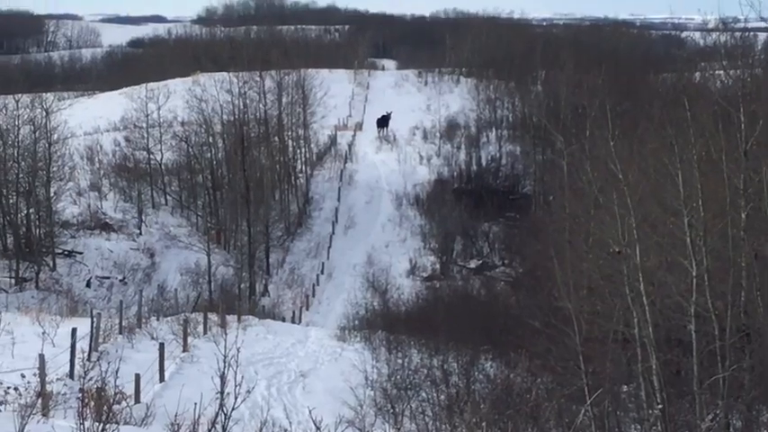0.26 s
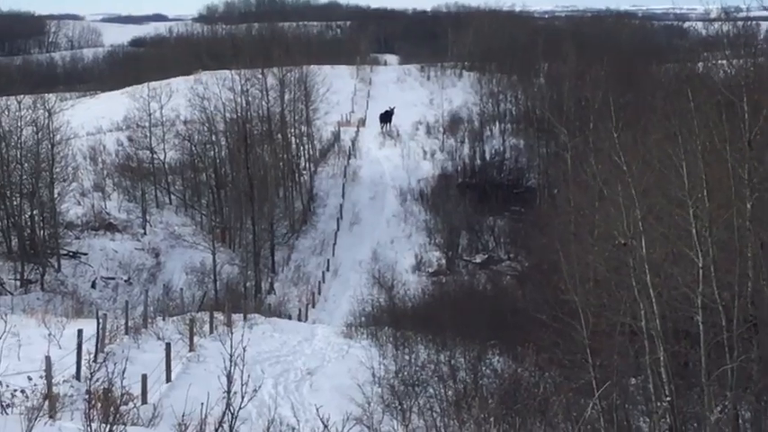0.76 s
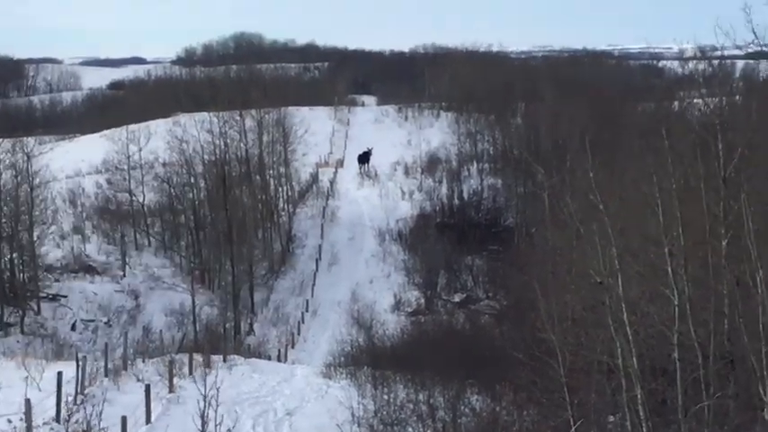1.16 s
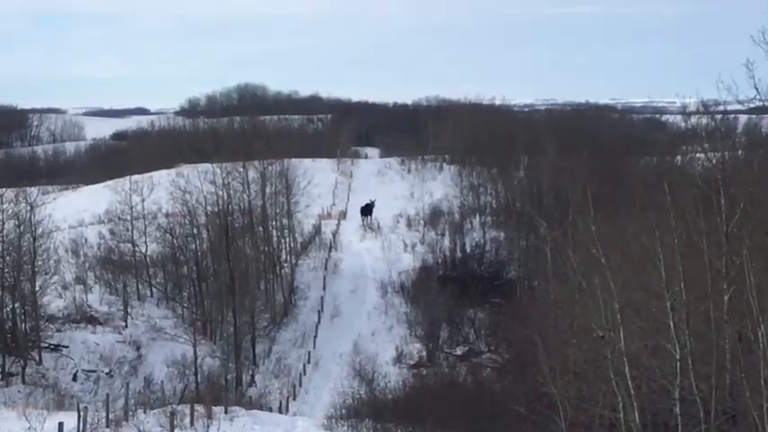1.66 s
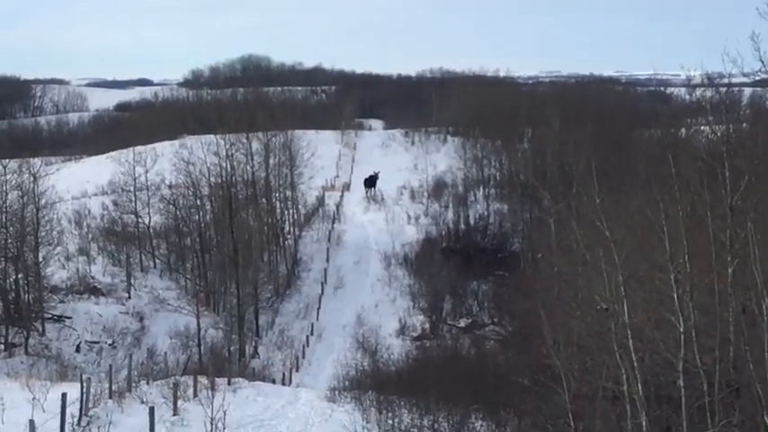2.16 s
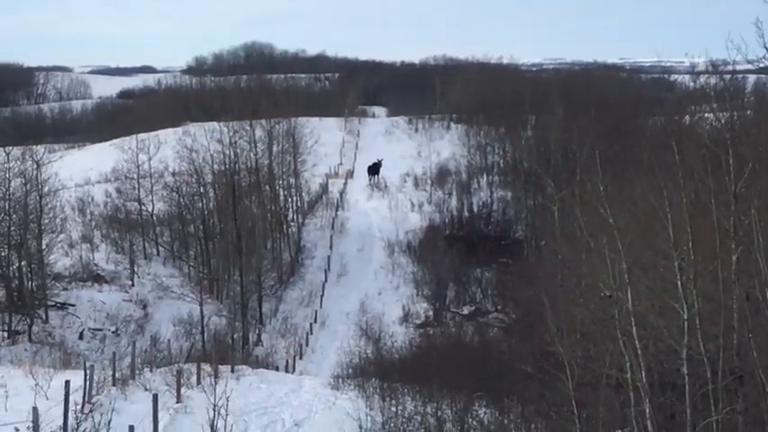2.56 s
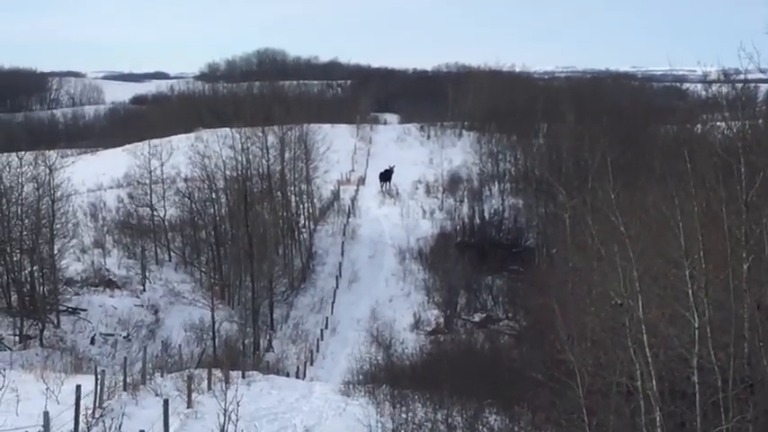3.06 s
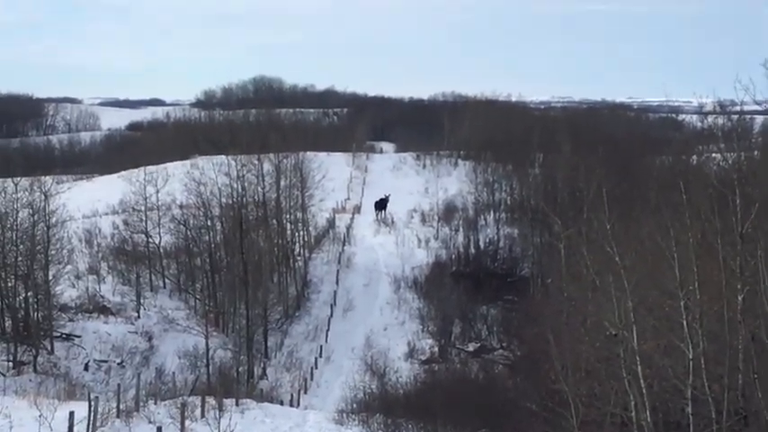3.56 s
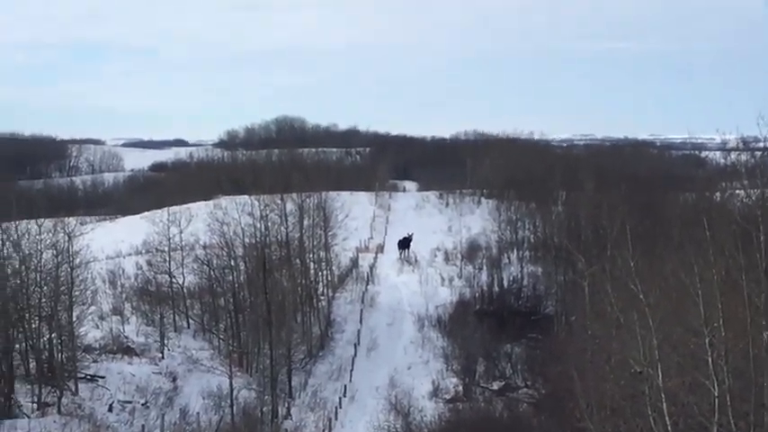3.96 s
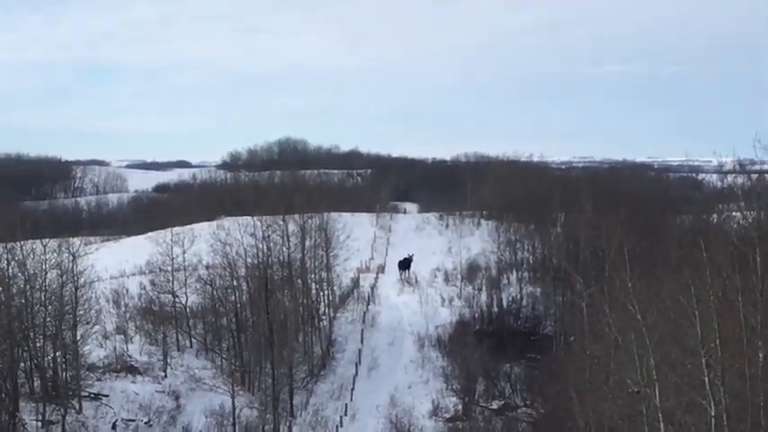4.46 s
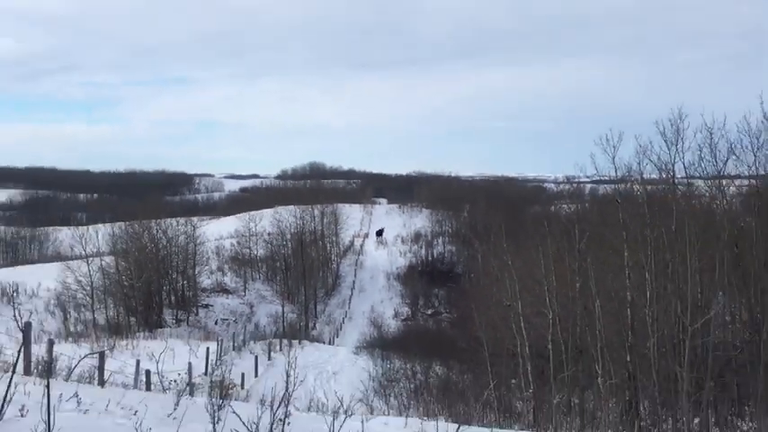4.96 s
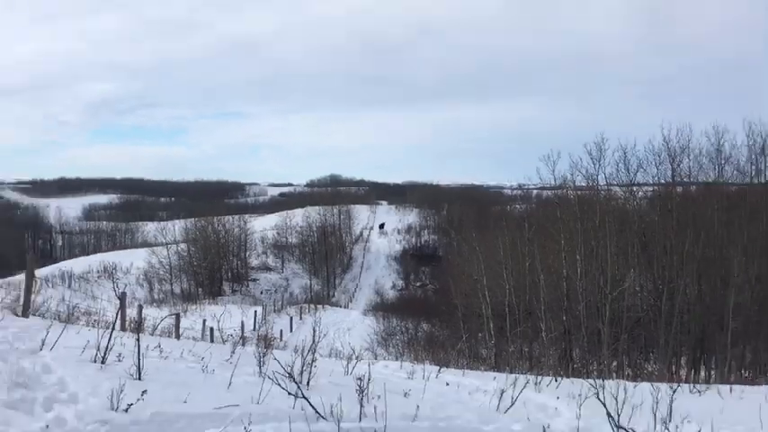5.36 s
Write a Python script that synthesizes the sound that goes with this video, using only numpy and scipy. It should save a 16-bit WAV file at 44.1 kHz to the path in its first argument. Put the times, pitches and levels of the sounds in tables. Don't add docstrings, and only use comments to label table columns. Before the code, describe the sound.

A two-stroke snowmobile idles close to a phone microphone on an open snowy trail, dry and without echo, for about 5.6 seconds. The low exhaust throbs quickly, around 28 crank turns a second, with stronger blasts roughly every other turn and a weaker cylinder catching unevenly, giving a lumpy, fluttering putter. Over it come midrange panel buzz, breathy gas surges, hollow pipe rings on misfires, dry metallic clutch ticks and short bright hisses. A loose cover adds a thin ringing at first, fading by 1.3 seconds. Clutch rattle is sharpest near 0.14 seconds, rises again around 1.5, 1.9, 2.2 and 2.7, then briefly near 3.7 and 3.9. Ticking is prominent around 4.6, drops just after, and loosens again near 5.1 and 5.4 to 5.6. Small stumbles recur, but the speed barely wavers; there is no revving or stopping, and the distant dark animal is not heard.

```python
import sys
import numpy as np
from scipy import signal
from scipy.fft import rfft, irfft
from scipy.io import wavfile
from scipy.ndimage import uniform_filter1d

SR = 44100
rng = np.random.default_rng(int(sys.argv[2]) if len(sys.argv) > 2 else 0)


def dump_mix(stems):
    frames = np.atleast_2d(stems).T
    limited = np.clip(frames, -1, 1)
    pcm = np.round(limited * 32767).astype(np.int16)
    wavfile.write(sys.argv[1], SR, pcm)


def ratio_of_db(decibels):
    return 10 ** (np.asarray(decibels, float) / 20)


N = 247389

IDLE_HZ = 28.27
STRONG_PORT_TURNS, WEAK_PORT_TURNS = .466, -.015
PORT_OPEN_S = 0.0203
FOULING = 0.75
LOOSE_HISS = 0.68
BLAST_PER_SURGE = 0.063
# (clatter [dB], gas surge [dB])
USUAL_DB, STUMBLE_DB, SCATTER_DB = (-42, -34), (-50.5, -51), (0.5, 0.6)

# (time [s], lead on a steady idle [turns])
CRANK_HUNTING = [(0.0, -0.896), (0.4, -0.865), (0.6, -0.841), (0.8, -0.771), (1.0, -0.743), (1.3, -0.709),
                 (1.6, -0.744), (1.85, -0.815), (2.3, -0.924), (2.8, -0.877), (3.05, -0.891), (3.4, -0.837),
                 (3.7, -0.852), (4.0, -0.935), (4.58, -0.961), (4.75, -0.94), (5.12, -0.986),
                 (5.35, -0.962)]
# (frequency [Hz], t60 [s], strong cylinder swing [1], weak cylinder swing [1])
SILENCER_MODES = [(42.5, .19, .076, .029), (70.9, .106, -.274, 0), (90.3, .109, -.261, .061),
                  (94.3, .49, -.094, -.077), (101, .138, .608, -.143), (120.5, .34, .1, -.041),
                  (141.3, .083, .017, .056), (159, .194, -.099, .009), (181, .048, -.085, .089)]
# (crank order [per turn], level [dB rms], crest angle [turns])
PUMPING_ORDERS = [(2, -21.7, 0), (3, -24.9, .036), (4, -28, -.122), (5, -24, .066), (6, -39.3, .013),
                  (7, -35.8, -.069)]
# (crank order [per turn], level [dB rms], crest angle [turns])
INTAKE_ORDERS = [(9, -41.5, 0.046), (11, -47.5, 0.015), (12, -45.5, -0.0038), (16, -50, -0.02)]
# (frequency [Hz], width [Hz], level from misfire backlash [dB], level from surge [dB])
PANEL_MODES = [(308, 67, -17, -3), (731, 30, -5.5, -9), (879, 26, -3.5, -13), (992, 56, -2, 3),
               (1069, 92, -7, 2.5), (1184, 144, -19, 0.5), (1557, 132, -7.5, -5.5), (2246, 360, -14, -12)]
# (frequency [Hz], density [dB per Hz])
GAS_SPECTRUM = [(100, -19), (170, -3), (227, -7.5), (371, -12), (444, -9.5), (565, -11.5), (718, -12),
                (800, -22.5), (892, -2.5), (970, -23), (1160, -19), (1750, -25.5), (3000, -42), (3900, -43),
                (6600, -120)]
# (frequency [Hz], density [dB per Hz])
HISS_SPECTRUM = [(1530, -30), (2600, -1.5), (2760, -42), (3000, -9), (3840, -9.5), (4330, -0.5),
                 (4780, -12.5), (5190, 0), (6070, -1), (7780, -9), (9320, -5), (10500, -14.5), (13500, -5),
                 (14400, -11.5), (15600, -10)]
# (frequency [Hz], width [Hz], level [dB], share of the lean [1])
CLUTCH_MODES = [(2250, 310, 7.5, -0.34), (2955, 29, 7.5, .6), (3320, 36, 5, -.5), (4400, 290, -7.5, -0.089),
                (5235, 89, 7.5, -1.4), (6047, 55, 3, 1.2), (6700, 270, -4.5, 0.58)]
# (frequency [Hz], t60 [s], weak cylinder level [dB], strong cylinder level [dB])
HEADER_MODES = [(299, 0.13, -35, -32), (451.5, 0.23, -38.5, -40.5), (547, .12, -39.5, -46),
                (724, 0.39, -34.5, -36), (886.7, 0.33, -31.5, -35.5), (1000, 0.045, -50, -37),
                (1101, 0.059, -46, -27), (1137, 0.038, -53, -36)]
# (first blast [s], last blast [s])
STRONG_RUN_TIMES = [(.058, .058), (.164, .375), (.517, 1.008), (1.043, 1.184), (1.29, 1.574),
                    (1.681, 2.746), (2.852, 3.487), (3.523, 3.736), (3.843, 4.198), (4.304, 4.304),
                    (4.411, 4.694), (4.8, 4.8), (4.906, 4.906), (5.013, 5.508)]
# (time [s], clatter [dB], gas surge [dB])
ODD_BLAST_LEVELS = [(.058, -66, -30), (.164, -49, -46), (.234, -46, -52), (.517, -43, -30.5),
                    (.727, -58, -39), (.937, -63, -47), (1.008, -73, -50), (1.184, -38.5, -39),
                    (1.502, -37, -26.5), (1.681, -55, -48), (1.895, -37, -29.5), (2.464, -43.5, -36),
                    (2.534, -53, -42), (2.923, -35, -28), (3.064, -37.5, -36), (3.276, -35, -27.5),
                    (3.346, -57, -29.5), (3.416, -41.5, -27.5), (3.594, -51, -44), (3.914, -39, -28.5),
                    (3.986, -47, -28), (4.057, -40, -32), (4.411, -42, -27.5), (4.623, -35, -28.5),
                    (4.694, -71, -47), (4.8, -69, -29.5), (4.906, -41, -33), (5.084, -34, -25.5),
                    (5.296, -55, -30), (5.508, -58, -37)]
# (first burn [s], last burn [s], burns before a miss [count], fresh charge [0-2])
WEAK_BOUT_TIMES = [(.04, .146, 2, 1.5), (.252, .429, 3, 1.2), (.499, .569, 3, 1.5), (.639, .709, 1, 1.15),
                   (.779, .849, 3, 1.3), (.99, 1.096, 2, 1.0), (1.166, 1.307, 2, 1.2),
                   (1.485, 1.52, 2, 1.2), (1.627, 1.627, 1, .9), (1.77, 1.984, 2, 1.1),
                   (2.127, 2.127, 1, 1.0), (2.234, 2.27, 2, .9), (2.376, 2.658, 1, 1.0),
                   (2.693, 2.764, 1, .95), (2.87, 2.976, 2, 1.05), (3.047, 3.082, 2, 1.2),
                   (3.258, 3.329, 3, 1.2), (3.399, 3.54, 3, .75), (3.647, 3.647, 1, .8),
                   (3.682, 3.682, 1, 1.9), (3.753, 3.789, 2, 1.2), (3.86, 4.003, 2, .9),
                   (4.039, 4.216, 3, .5), (4.287, 4.358, 1, .5), (4.429, 4.464, 2, 1.0),
                   (4.641, 4.817, 4, .75), (4.924, 4.924, 1, .7), (5.031, 5.066, 2, 1.3),
                   (5.137, 5.455, 3, 1.05), (5.525, 5.561, 2, .65)]
# (time [s], hiss [dB], clutch tick [dB], tick lean to upper mode [dB])
DRIVE_PATH = [
    (0, -60.5, -59.5, 2.5),
    (1.1, -57, -56.5, 2),
    (1.7, -57, -53, 4),
    (2.15, -57.5, -60.5, 14),
    (2.3, -57.5, -54.5, 1),
    (2.9, -56, -56, 3),
    (4.0, -56, -54, -0.5),
    (4.62, -56, -51, 0),
    (4.76, -56.5, -58.5, 0),
    (5.61, -55.5, -56, 2),
]
# (loosest time [s], build-up [s], settling [s], tick rise [dB])
LOOSE_SPELLS = [
    (.14, .05, 0.016, 14),
    (1.5, 0.089, 0.069, 3.5),
    (1.86, .2, 0.12, 7),
    (2.23, 0.11, 0.15, 7.5),
    (2.67, 0.28, .05, 5.5),
    (3.66, 0.036, .04, 5),
    (3.94, 0.018, 0.12, 5),
    (5.08, 0.17, .05, 5.5),
    (5.39, .02, 0.059, 2),
    (5.57, .03, 0.026, 5),
]


def colour(x, points):
    hz, db = np.transpose(points)
    f = np.fft.rfftfreq(N, 1 / SR)
    gain = ratio_of_db(np.interp(np.log(f + 1), np.log(hz), db, left=-90, right=-90))
    return irfft(rfft(x) * gain / np.sqrt(np.mean(gain ** 2)), N)


def ring(x, hz, width_hz):
    return signal.lfilter(*signal.iirpeak(hz, hz / width_hz, SR), x)


def decaying_modes(t, hz, t60_s):
    return np.sin(2 * np.pi * np.outer(t, hz)) * np.exp(-np.log(1000) * t[:, None] / t60_s)


def strikes(turn, turns, sizes):
    out = np.zeros(N)
    inside = (turns > turn[0]) & (turns < turn[-1])
    samples = np.interp(turns[inside], turn, np.arange(N)).astype(int)
    np.add.at(out, samples, (sizes + 0 * turns)[inside])
    return out


def burst(x, rise_s, fall_s):
    for tau_s in (rise_s, fall_s):
        x = signal.lfilter([1], [1, -np.exp(-1 / (tau_s * SR))], x)
    return x / (rise_s * SR)


def firing(turn_at):
    runs = [np.arange(first, last + 1, 2) for first, last in turn_at(STRONG_RUN_TIMES)]
    strong = np.concatenate(runs)
    last_of_run = np.isin(strong, [run[-1] for run in runs])[:, None]
    after_db = np.where(last_of_run, STUMBLE_DB, USUAL_DB)
    after_db = after_db + SCATTER_DB * rng.standard_normal((len(strong), 2))
    odd = np.array(ODD_BLAST_LEVELS)
    after_db[np.searchsorted(strong, turn_at(odd[:, 0]))] = odd[:, 1:]
    weak, charge = [], []
    for first_s, last_s, row, fresh in WEAK_BOUT_TIMES:
        turns = np.arange(turn_at(first_s), turn_at(last_s) + 1)
        place = (turns - turns[0]) % (row + 1)
        burns = place < row
        weak.append(turns[burns])
        charge.append(fresh * FOULING ** place[burns])
    return strong, after_db.T, np.concatenate(weak), np.concatenate(charge)


def crank_orders(turn, table):
    return sum(ratio_of_db(db) * np.cos(2 * np.pi * order * (turn - crest)) for order, db, crest in table)


def exhaust(turn, strong, weak, charge, surge_db):
    hz, t60_s, strong_swing, weak_swing = np.transpose(SILENCER_MODES)
    modes = decaying_modes(np.arange(SR // 2) / SR, hz, t60_s)
    strong_hits = strikes(turn, strong + STRONG_PORT_TURNS, ratio_of_db(BLAST_PER_SURGE * (surge_db + 35.0)))
    weak_hits = strikes(turn, weak + WEAK_PORT_TURNS, charge)
    blasts = signal.fftconvolve(strong_hits, modes @ strong_swing)[:N]
    blasts += signal.fftconvolve(weak_hits, modes @ weak_swing)[:N]
    pump = crank_orders(turn, PUMPING_ORDERS)
    hum = crank_orders(turn, INTAKE_ORDERS)
    swell = 0.76 + burst(strikes(turn, strong + 1.27, 1.0), 0.0057, 0.014)
    return ratio_of_db(.5) * blasts + np.sqrt(2) * (pump + swell * hum)


def bodywork(turn, every, strong, slack, surge_db):
    chance = rng.standard_normal((len(every), 2))
    force = ratio_of_db(surge_db + 30.0)
    slack_force = force * slack[strong.astype(int) + 2]
    knock = strikes(turn, strong + 1.1, slack_force)
    thud = strikes(turn, strong + 1.6, force)
    thud += strikes(turn, every + .5, ratio_of_db(1.1 * chance[:, 1] - 5.5))
    surge = burst(strikes(turn, strong + 1.07, slack_force), 0.0016, 0.0083)
    surge += burst(thud, 0.0022, 0.002)
    lash = burst(strikes(turn, every - .02, slack * ratio_of_db(2.0 * chance[:, 0])), 0.015, 0.0037)
    backlash = (.15 + lash) * rng.standard_normal(N)
    gush = (0.32 + surge) * rng.standard_normal(N) + ratio_of_db(19) * (thud + 0.3 * knock)
    panels = np.zeros(N)
    for k, (hz, width_hz, lash_db, gush_db) in enumerate(PANEL_MODES):
        drive = ratio_of_db(lash_db) * backlash + ratio_of_db(gush_db) * gush
        panels += (-1) ** k * ring(drive, hz, width_hz)
    gas = colour((1.02 + .5 * surge + 0.057 * lash) * rng.standard_normal(N), GAS_SPECTRUM)
    settling = np.clip(1.3 - np.arange(N) / SR, 0, 1)
    cover = ring(rng.standard_normal(N), 1835, 60) * settling
    return ratio_of_db(-16.0) * panels + ratio_of_db(-35.5) * gas + ratio_of_db(-29.5) * cover


def clatter(turn, every, strong, slack, clatter_db):
    t = np.arange(N) / SR
    path_s, hiss_db, tick_db, lean_db = np.transpose(DRIVE_PATH)
    loose_db = sum(np.interp(t, [at - rise, at, at + fall], [0, db, 0]) for at, rise, fall, db in LOOSE_SPELLS)
    hiss_db = np.interp(t, path_s, hiss_db) + LOOSE_HISS * loose_db
    tick_db = np.interp(t, path_s, tick_db) + loose_db
    lean_db = np.interp(t, path_s, lean_db)

    chance = rng.standard_normal((len(every), 2))
    tick = burst(strikes(turn, every + .29, ratio_of_db(1.8 * chance[:, 0])), .0004, .005)
    tick += burst(strikes(turn, every + 0.4, ratio_of_db(3.5 * chance[:, 1] - 5.5)), .0008, 0.011)
    rattle = ratio_of_db(tick_db + 6.5) * tick * rng.standard_normal(N)
    modes = sum(ratio_of_db(db + share * lean_db) * ring(rattle, hz, width_hz)
                for hz, width_hz, db, share in CLUTCH_MODES)
    ticks = ring(rattle, 5640, 3600) + ratio_of_db(7.5) * modes
    ticks = signal.sosfilt(signal.butter(6, 9800, fs=SR, output="sos"), ticks)

    force = ratio_of_db(clatter_db - 11.5)
    slack_force = force * slack[strong.astype(int) + 2]
    spit = burst(strikes(turn, strong + 1.15, 1.6 * slack_force), .0004, .004)
    blow = burst(strikes(turn, strong + 1.13, 1.48 * force), 0.0053, 0.012)
    grit = ratio_of_db(1.26 * uniform_filter1d(rng.standard_normal(N), 60) * np.sqrt(60))
    sizzle = ring((2.5 * spit + blow) * rng.standard_normal(N), 13500, 4000)
    hiss = colour(grit * (ratio_of_db(hiss_db - 1.0) + spit + blow) * rng.standard_normal(N), HISS_SPECTRUM)
    return ticks + ratio_of_db(-8.0) * sizzle + hiss


def header(turn, every, strong, slack, surge_db):
    t = np.arange(SR // 20) / SR
    hz, t60_s, weak_db, strong_db = np.transpose(HEADER_MODES)
    port = np.clip(t / 0.0069, 0, 1) * np.clip((PORT_OPEN_S - t) / 0.0014, 0, 1)
    modes = decaying_modes(t, hz, t60_s) * port[:, None]
    chance = rng.standard_normal((len(every), 4))
    rested = np.bincount(strong.astype(int) + 2, ratio_of_db(0.19 * (surge_db + 36)), len(every))
    weak_hits = strikes(turn, every - .03 + .004 * chance[:, 0], slack * ratio_of_db(1.2 * chance[:, 1]))
    strong_hits = strikes(turn, every + .47 + 0.0029 * chance[:, 2], rested * ratio_of_db(1.6 * chance[:, 3]))
    weak_ring = signal.fftconvolve(weak_hits, modes @ ratio_of_db(weak_db))
    strong_ring = signal.fftconvolve(strong_hits, modes @ ratio_of_db(strong_db))
    return (weak_ring + strong_ring)[:N]


def scene():
    t = np.arange(N) / SR
    turn = IDLE_HZ * t + np.interp(t, *np.transpose(CRANK_HUNTING))
    strong, (clatter_db, surge_db), weak, charge = firing(lambda s: np.floor(np.interp(s, t, turn)))
    every = np.arange(-1, turn[-1] // 1 + 1)
    burnt = np.bincount(weak.astype(int) + 1, charge, len(every))
    slack = ratio_of_db(-12.0 * np.clip(2 * burnt - .7, 0, 1))
    sound = exhaust(turn, strong, weak, charge, surge_db)
    sound += bodywork(turn, every, strong, slack, surge_db)
    sound += clatter(turn, every, strong, slack, clatter_db)
    sound += header(turn, every, strong, slack, surge_db)
    return sound[None]


def band_limit(x):
    return signal.sosfilt(signal.butter(12, 15790, fs=SR, output="sos"), x)


def record(dry):
    mix = signal.sosfilt(signal.butter(1, 12, "high", fs=SR, output="sos"), dry)
    return band_limit(mix)


dry = scene()
out = record(dry)
dump_mix(out)
```